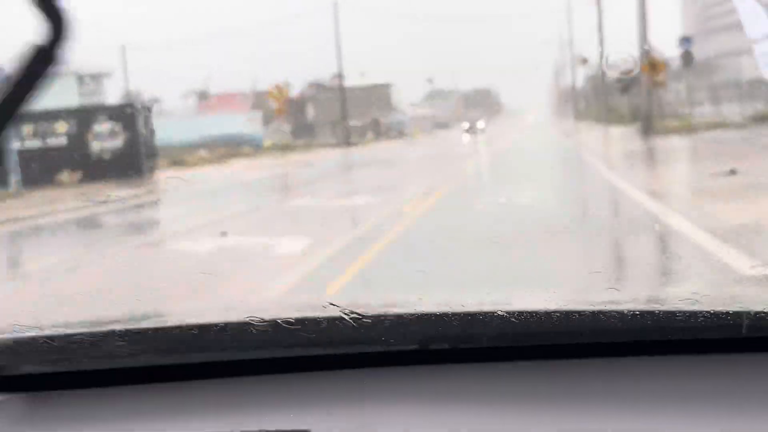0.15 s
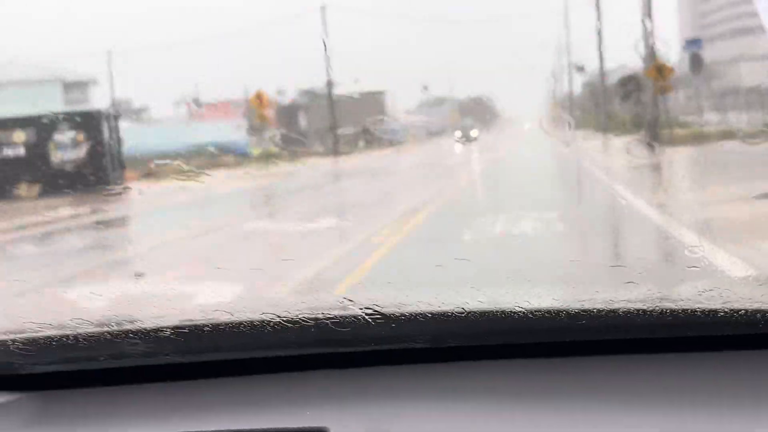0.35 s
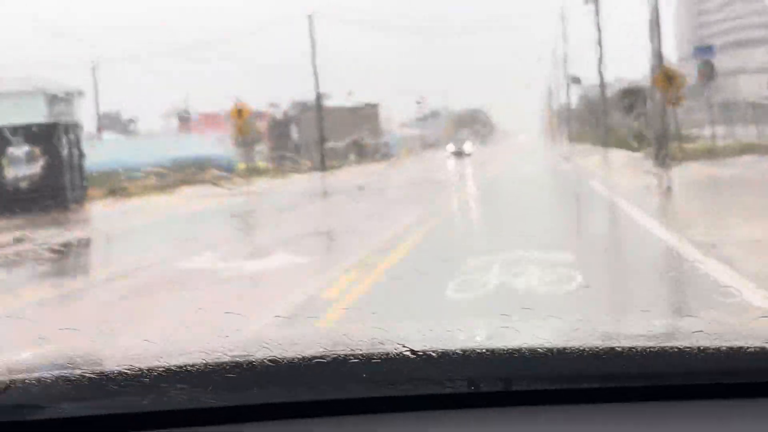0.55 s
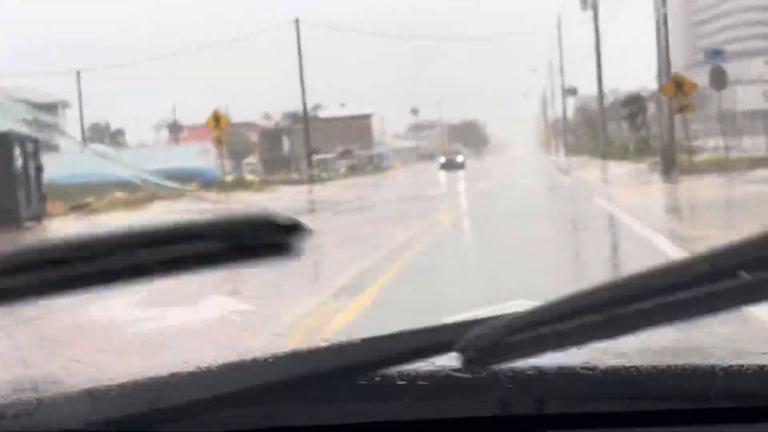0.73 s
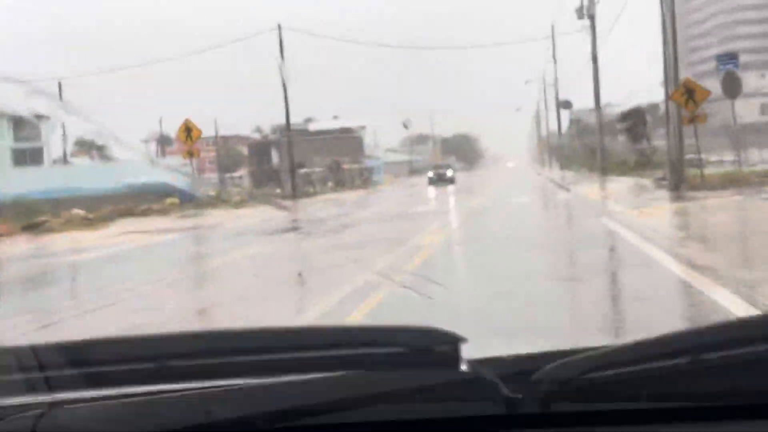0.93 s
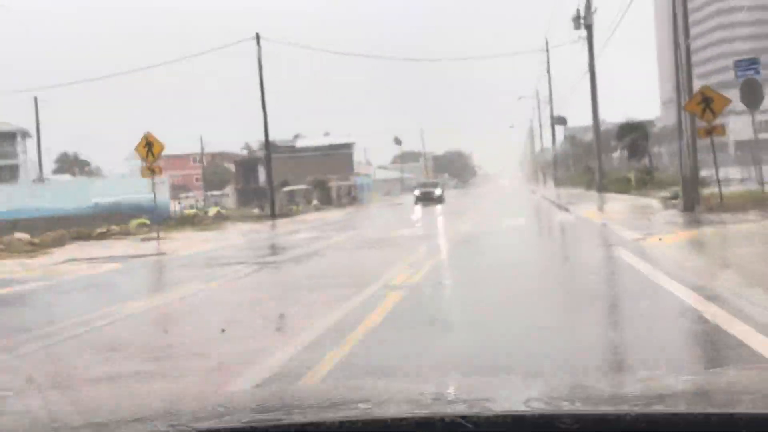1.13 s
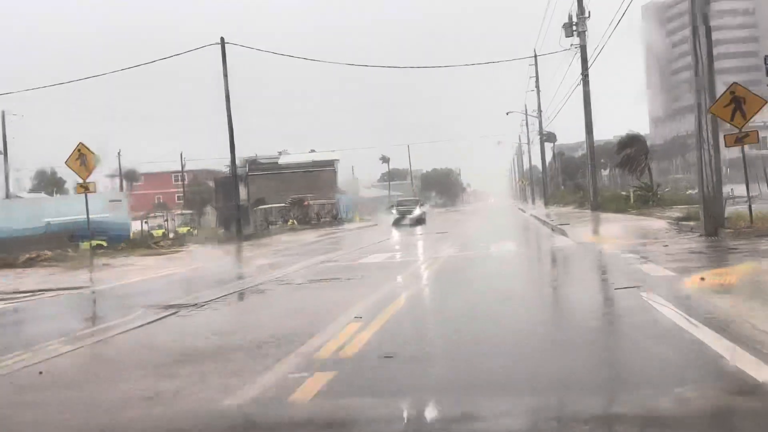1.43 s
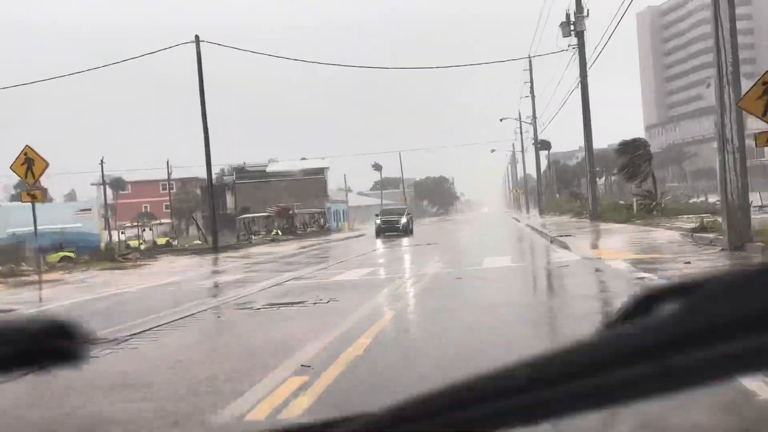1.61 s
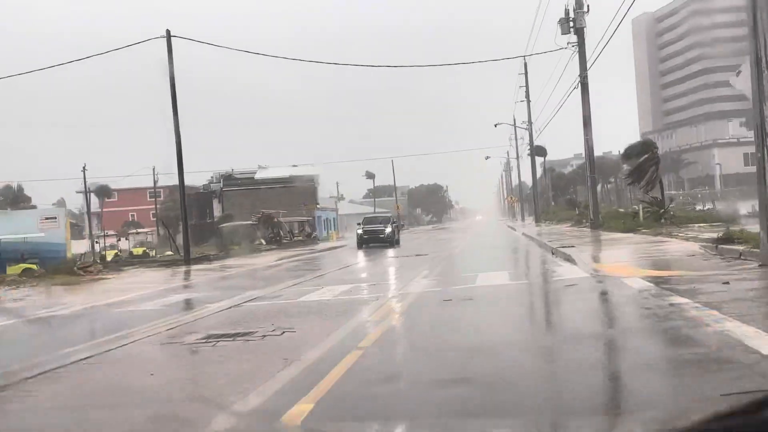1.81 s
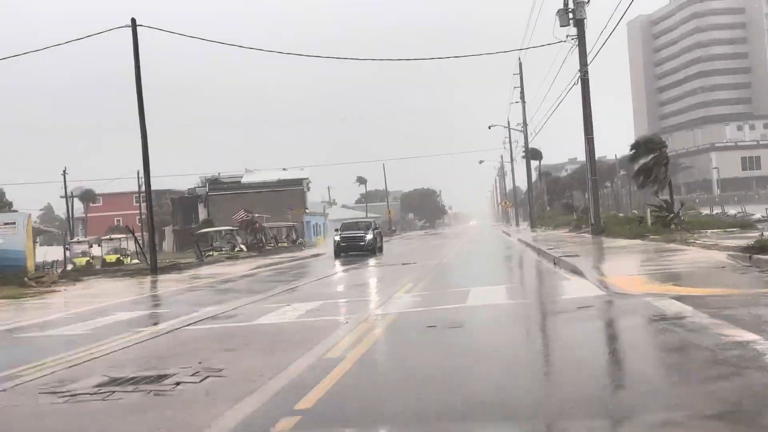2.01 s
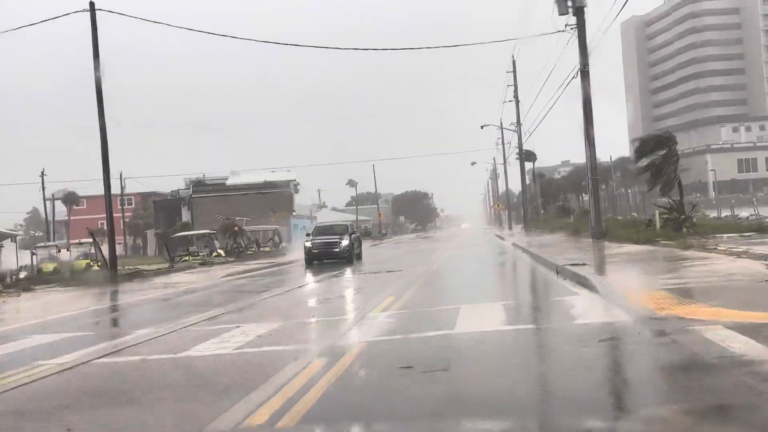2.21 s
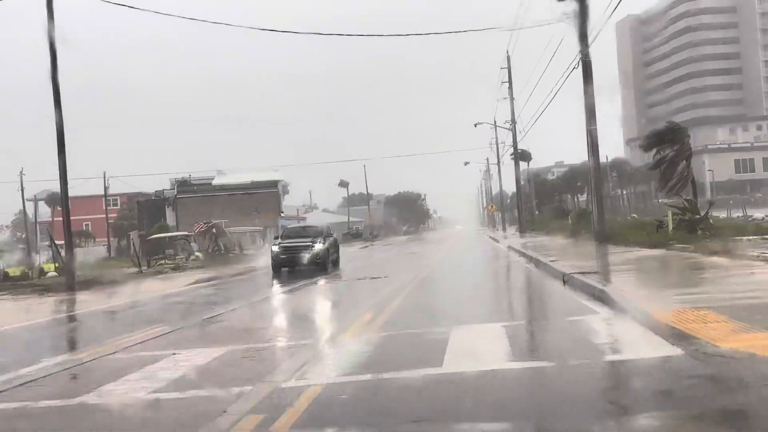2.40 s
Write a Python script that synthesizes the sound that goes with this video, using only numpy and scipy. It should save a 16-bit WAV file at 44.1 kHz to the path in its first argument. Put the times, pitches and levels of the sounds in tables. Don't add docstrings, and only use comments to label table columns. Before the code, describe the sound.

Rain pelting a moving car's windscreen and roof over low, bumpy road rumble and dull wiper knocks

```python
import sys
import numpy as np
from scipy import signal
from scipy.fft import rfft, irfft
from scipy.io import wavfile
from scipy.ndimage import uniform_filter1d

SR = 44100
rng = np.random.default_rng(int(sys.argv[2]) if len(sys.argv) > 2 else 0)


def transcribe(u):
    v = np.clip(np.atleast_2d(u).T, -1, 1)
    q = np.round(v * 32767).astype(np.int16)
    wavfile.write(sys.argv[1], SR, q)


def to_linear_factor(level_db):
    exponent = np.asarray(level_db, float) / 20
    return 10 ** exponent


N = 112454
T, F = np.arange(N) / SR, np.arange(N // 2 + 1) * SR / N

# (centre time [s], peak level [dB],
# pitch [Hz], length [s])
BOOM_SWELLS = [(0.015, -16, 89.8, 0.013), (0.094, -16.5, 61.6, 0.021), (0.134, -21, 73, 0.015),
               (0.169, -24, 76, 0.01), (0.224, -29, 72, 0.023), (0.29, -12.5, 71.6, 0.011),
               (0.337, -15, 69.6, 0.015), (0.38, -14, 68.9, 0.017), (0.433, -11.5, 65.5, 0.022),
               (0.5, -14, 59.1, 0.054), (0.562, -11, 66.4, 0.019), (0.599, -9.5, 72.3, 0.011),
               (0.636, -10, 69.6, 0.018), (0.677, -11, 70.7, 0.019), (0.719, -19, 61.7, 0.056),
               (0.754, -13.5, 65.1, 0.054), (0.83, -16.5, 79.3, 0.035), (0.874, -7, 88.5, 0.017),
               (0.902, -14.5, 82, 0.034), (0.963, -17.5, 71.4, 0.0094), (1.038, -13.5, 74.2, 0.031),
               (1.105, -16, 70.6, 0.018), (1.199, -18, 76.4, 0.037), (1.345, -9.5, 72.6, 0.014),
               (1.374, -21, 64.7, 0.014), (1.403, -22, 76.1, 0.013), (1.433, -16, 67.2, 0.014),
               (1.494, -14, 82.56, 0.014), (1.57, -20.5, 78.3, 0.037), (1.622, -18, 89.2, 0.013),
               (1.653, -10, 74.7, 0.0075), (1.685, -14.5, 75.2, 0.0086), (1.76, -12.4, 82.5, 0.016),
               (1.783, -15, 87.66, 0.046), (1.835, -13, 73.7, 0.011), (1.878, -18.5, 81.6, 0.016),
               (1.911, -17, 67.2, 0.021), (1.959, -12, 78.5, 0.023), (1.994, -7.5, 86.6, 0.02),
               (2.022, -16, 87.66, 0.03), (2.049, -12, 91.4, 0.042), (2.09, -19, 88.9, 0.026),
               (2.171, -8.5, 71.6, 0.066), (2.255, -14, 65.86, 0.0074), (2.279, -22, 70.83, 0.042),
               (2.317, -20, 83.7, 0.019), (2.434, -13, 81.8, 0.032), (2.474, -42, 64, 0.033)]
# (frequency [Hz], density [dB per Hz])
TYRE_SPRAY_COLOUR = [(1800, 0), (2300, -1), (3200, -5.5), (4200, -11)]
# (frequency [Hz], density [dB per Hz])
ROOF_MID_COLOUR = [(110, 1), (140, -7), (204, -8.5), (269, -12.5), (310, -17.5), (450, -20.5),
                   (1000, -33.5), (1700, -42)]
# (frequency [Hz], density [dB per Hz])
ROOF_SIDE_COLOUR = [(40, -26), (90, -2), (140, -6.5), (209, -5), (452, -11), (1130, -22.5), (1800, -30),
                    (2600, -43)]
# (frequency [Hz], width [Hz], level [dB])
ROOF_MODES = [(190, 9.7, -37.5), (226, 26, -39), (269, 22.5, -43)]
# (time [s], peak level [dB], ring [Hz], ring t60 [s], side share [0-1])
BODY_KNOCKS = [(.042, -44, 347, 0.014, 0.8), (0.251, -45, 410, 0.035, 0.36), (0.43, -21.5, 473, 0.019, 0.5),
               (1.051, -26.5, 450, 0.03, .4), (1.34, -25.5, 453, 0.047, 0.38),
               (1.487, -24.5, 437.7, 0.033, 0.38), (2.2522, -21, 430, 0.037, 0.5),
               (0.864, -16, 190, 0.14, 0.17), (1.049, -24.5, 197, 0.13, 0.08),
               (1.775, -23, 190, 0.128, 0.42), (2.139, -21, 190, 0.061, 0.24), (0.068, -25.5, 200, 0.05, 0),
               (0.321, -22, 176, 0.12, 0.11), (.452, -18, 133, 0.11, 0.07), (.536, -25.5, 181, .06, 0.16),
               (0.724, -19.5, 151, 0.06, 0.2), (.872, -21, 132, 0.036, 0.44), (1.342, -17.5, 143, .06, 0.3),
               (1.64, -26, 145.4, 0.16, .1), (1.784, -12, 125.9, 0.1, .1), (2.248, -21, 141, 0.049, 0),
               (2.418, -20, 157.6, 0.056, 0), (0.403, -39, 610, .03, 0.1), (.69, -31, 420, 0.034, 0.5),
               (1.31, -35, 540, 0.015, 0.29), (2.224, -24.5, 340, 0.053, 0.37),
               (2.285, -33.5, 700, 0.025, 0.53), (0.384, -22, 205, 0.064, 0)]
# (time [s], level [dB])
RAIN_GUSTS = [(0, -51), (.1, -50.5), (.25, -50.5), (.45, -54), (.8, -51.5), (.9, -49.5), (1.35, -50),
              (1.45, -51.5), (1.6, -47.5), (2.0, -50.5), (2.3, -45.5), (2.55, -51.5)]
# (time [s], length [s], swell [dB])
SPRAY_SHEETS = [(.01, 0.052, 5), (0.482, 0.064, 6), (0.855, 0.031, 3), (.93, 0.043, 2.5),
                (1.007, .025, 3.5), (1.086, 0.025, 4), (1.122, 0.14, 7.5), (1.32, 0.021, 4),
                (1.719, 0.12, 4.5), (1.856, 0.029, 4.5), (1.952, 0.032, 2), (2.058, 0.053, 2.5),
                (2.14, 0.092, 4)]
# (frequency [Hz], density [dB per Hz])
GLASS_COLOUR = [(1500, -2), (2100, 2), (2900, 1), (5000, 2), (7000, -3.5), (9200, -7.5), (12000, -8.5),
                (15700, -16.5)]
# (time [s], peak level [dB], ring [Hz], ring t60 [s])
FAT_DROPS = [(.0169, -26, 4540, 0.028), (0.1098, -34.5, 2600, 0.041), (0.2388, -31, 2300, 0.03),
             (0.324, -39, 3440, 0.015), (0.3583, -37, 2600, .015), (.549, -37, 4735, 0.021),
             (0.739, -34.5, 6900, 0.0082), (0.741, -38, 5200, .03), (0.763, -41, 4430, 0.041),
             (0.853, -39.5, 5000, .02), (1.0948, -30.5, 4840, 0.01), (1.2154, -28, 5570, 0.012),
             (1.267, -34, 3500, 0.014), (1.3116, -30.5, 4530, 0.017), (1.319, -28, 5300, 0.0089),
             (1.374, -36, 4600, 0.0056), (1.6838, -41.5, 4830, 0.013), (1.702, -32, 9380, 0.023),
             (1.724, -37, 5000, .01), (1.759, -29.5, 2170, 0.03), (1.788, -32.5, 2460, .03),
             (1.877, -25.5, 3900, 0.018), (2.0376, -40, 2370, .015), (2.15, -35, 4600, .02),
             (2.056, -32, 3062, 0.014), (2.087, -36, 5050, .015), (2.187, -30, 2600, 0.017),
             (2.237, -32.5, 4500, 0.018), (2.411, -29.5, 2220, 0.014), (2.548, -26.5, 4370, 0.027)]
# (time [s], peak level [dB], ring [Hz], ring t60 [s])
BLADE_SNAPS = [
    (2.2762, -21, 7000, .022),
    (2.277, -20, 9500, .006),
    (2.2852, -15, 4800, .009),
    (2.2856, -16.5, 9000, .006),
    (2.288, -22, 5160, .055),
    (2.2935, -26, 5200, .012),
]
# (frequency [Hz], phase [turns])
PORT_PHASE = [(5500, 0.), (6450, .14), (6950, .22), (7050, .8), (8500, 1.), (9400, 1.), (11150, 1.45),
              (12900, 1.55), (14500, 2.)]


def level(x, db):
    return x * to_linear_factor(db) / np.sqrt(np.mean(x ** 2))


def curve(table, axis=1):
    points = np.array(table)
    return np.interp(T, points[:, 0], points[:, axis])


def colour(x, table, skirt_db=40):
    hz, db = np.array(table).T
    octave = np.log2(F + 1)
    below = np.maximum(np.log2(hz[0]) - octave, 0)
    above = np.maximum(octave - np.log2(hz[-1]), 0)
    gain_db = np.interp(octave, np.log2(hz), db) - skirt_db * (below + above)
    return irfft(rfft(x) * to_linear_factor(gain_db), N)


def walk(rate):
    hold = int(SR / rate)
    steps = np.repeat(rng.standard_normal(N // hold + 1), hold)
    return 1.32 * uniform_filter1d(uniform_filter1d(steps, hold), hold)[:N]


def patter(per_s, spread_db):
    moment, sign, size = rng.random((3, N))
    size_db = np.minimum(-spread_db * np.log(1 - size), 12.5)
    return level((moment < per_s / SR) * np.sign(sign - .5) * to_linear_factor(size_db), 0)


def ring(hz, t60, rise_s):
    t = T[:8192 if hz < 1500 else 4096]
    return np.sin(2 * np.pi * hz * t) * (1 - np.exp(-t / rise_s)) * 1000 ** (-t / t60)


def band(x, order, low_hz, high_hz):
    return signal.sosfilt(signal.butter(order, [low_hz, high_hz], "band", fs=SR, output="sos"), x)


def add(out, s, x):
    i = int(s * SR)
    out[..., i:i + x.shape[-1]] += x[..., :N - i]


def cabin_boom():
    power = to_linear_factor(2 * -33)
    for s, db, hz, length in BOOM_SWELLS:
        power = power + to_linear_factor(2 * db) * np.exp(-((T - s) / (0.53 * length)) ** 2)
    pitch_hz = curve(BOOM_SWELLS, axis=2) * (1 + .02 * walk(29.67))
    boom = np.sqrt(power) * np.sin(2 * np.pi * np.cumsum(pitch_hz) / SR)
    return boom * (1 + 0.045 * np.array([[-1], [1]]))


def road_rumble():
    centre_hz, width_hz = 56.2, 62
    gain = 1 / (1 + ((F - centre_hz ** 2 / (F + 1)) / width_hz) ** 4)
    return level(irfft(rfft(rng.standard_normal(N)) * gain, N), -26)


def tyre_spray():
    hiss = rng.standard_normal(N) * to_linear_factor(1.4 * walk(20))
    return level(colour(hiss, TYRE_SPRAY_COLOUR), -55)


def roof_drops():
    beat = patter(900, 1.64) + 1.77 * rng.standard_normal(N)
    return beat * to_linear_factor(0.5 * walk(9.16))


def roof_drumming():
    mid = level(colour(roof_drops(), ROOF_MID_COLOUR), -29)
    side = level(colour(roof_drops(), ROOF_SIDE_COLOUR), -39)
    for hz, width_hz, db in ROOF_MODES:
        resonance = 1 + ((F - hz) / width_hz) ** 2 * 4
        mode = level(irfft(rfft(roof_drops()) / resonance, N), db)
        mid += mode * to_linear_factor(-2 * T)
    return np.array([mid, side])


def body_knocks():
    out = np.zeros((2, N))
    for s, db, hz, t60, side_share in BODY_KNOCKS:
        u, grit = rng.random(2), rng.standard_normal(8192)
        lower = ring(hz * (.7 + 0.16 * u[0]), t60, .5 / hz)
        upper = ring(hz * (1.25 + 0.18 * u[1]), t60, .5 / hz)
        knock = ring(hz, t60, .5 / hz) + 0.17 * (lower + upper)
        if hz > 300:
            knock += to_linear_factor(-12) * ring(hz * 1.8, 0.29 * t60, 0.9 / hz)
        knock /= np.abs(knock).max()
        if hz > 300:
            thud = band(grit * 1000 ** (-T[:8192] / t60), 2, hz * 0.92, hz * 1.7)
            knock += to_linear_factor(-5) * thud / np.abs(thud).max()
        knock *= to_linear_factor(db) / np.abs(knock).max()
        add(out, s, knock * np.array([[1], [side_share]]))
    return out


def ticks(table):
    out, t = np.zeros(N), T[:4096]
    for s, db, hz, t60 in table:
        order = 2 if hz < 3600 or t60 > .04 else 1
        spray = band(rng.standard_normal(4096), order, hz / 2.03, min(hz * 2.1, 18000))
        splash = spray * (1 - np.exp(-t / 0.0002)) * 1000 ** (-t / t60)
        tick = splash + 0.63 * ring(hz, .5 * t60, 0.00038)
        add(out, s, tick * to_linear_factor(db) / np.abs(tick).max())
    return out


def gusts():
    def edge(s):
        return .5 + .5 * np.tanh((T - s) / 0.0019)
    gain_db = curve(RAIN_GUSTS) + .4 * walk(13.6)
    for s, length, db in SPRAY_SHEETS:
        gain_db += db * edge(s) * (1 - edge(s + length))
    return to_linear_factor(gain_db)


def rain_on_glass():
    smear = rng.standard_normal(600) * 1000 ** (-T[:600] / 0.0087)
    smear[0] += 4
    phase = np.exp(1j * np.angle(rfft(smear, N)))
    drops = level(irfft(rfft(patter(3500, 4)) * phase, N), 0)
    mist = to_linear_factor(-4) * rng.standard_normal(N)
    x = (drops + mist) * to_linear_factor(1.1 * walk(60.64))
    return level(colour(x, GLASS_COLOUR, skirt_db=37), -1.22)


def ports(x, stretch):
    half = np.exp(1j * np.pi * np.interp(F * stretch, *np.array(PORT_PHASE).T))
    return irfft(rfft(x) * np.array([half, half.conj()]) * (F < 15950), N)


def snap_from_side(x):
    lag_s, top_hz = 16e-6, 16200
    turn = np.exp(1j * np.pi * F * lag_s * np.array([[1], [-1]]))
    return irfft(rfft(x) * turn / (1 + (F / top_hz) ** 60), N)


def scene():
    mid, side = roof_drumming() + body_knocks()
    body = mid + cabin_boom() + road_rumble() + side * np.array([[1], [-1]])
    lean_db = np.interp(np.log(F + 1), np.log([200, 1500]), [-0.82, 1.6])
    body = irfft(rfft(body) * to_linear_factor(lean_db * np.array([[.5], [-.5]])), N)
    gust = gusts()
    glass = ports(ticks(FAT_DROPS) + tyre_spray(), 0.963)
    glass += ports(rain_on_glass() * gust, 1.015) + ports(rain_on_glass() * gust, 0.985)
    return body + glass + snap_from_side(ticks(BLADE_SNAPS))


def band_limit(x):
    return signal.sosfilt(signal.butter(12, 16600, fs=SR, output="sos"), x)


def record(dry):
    low_cut = signal.butter(3, 36, "high", fs=SR, output="sos")
    mix = signal.sosfilt(low_cut, dry)
    return band_limit(mix)


dry = scene()
out = record(dry)
transcribe(out)
```